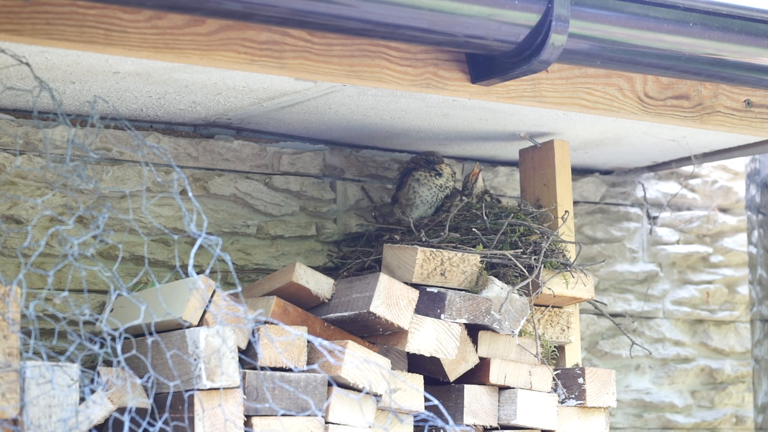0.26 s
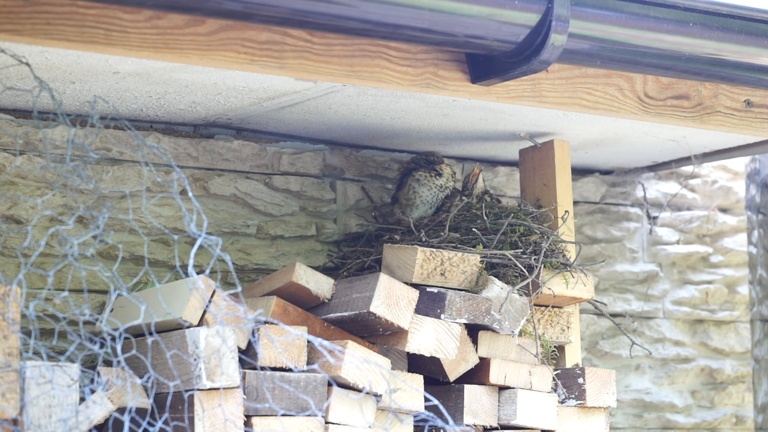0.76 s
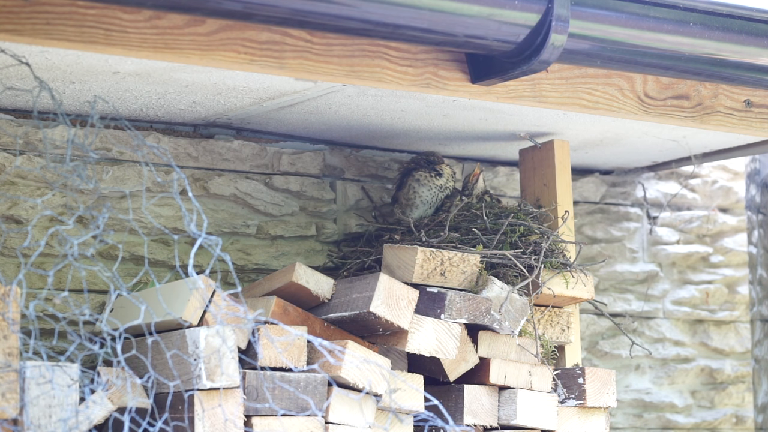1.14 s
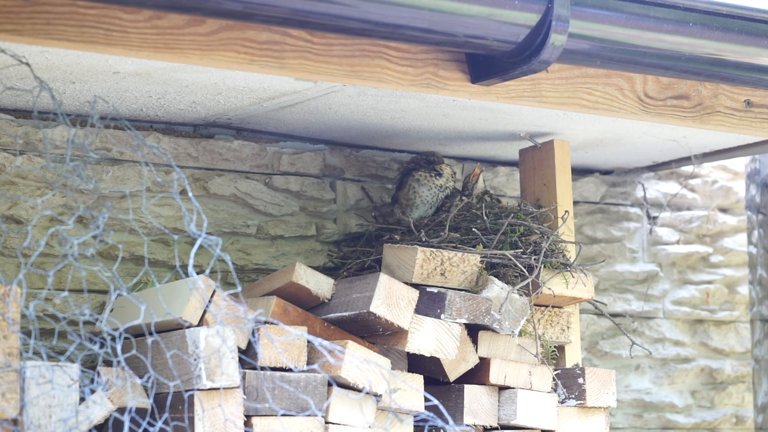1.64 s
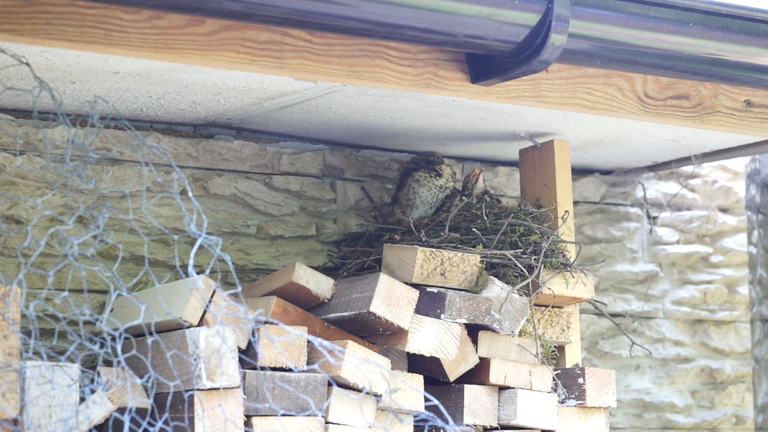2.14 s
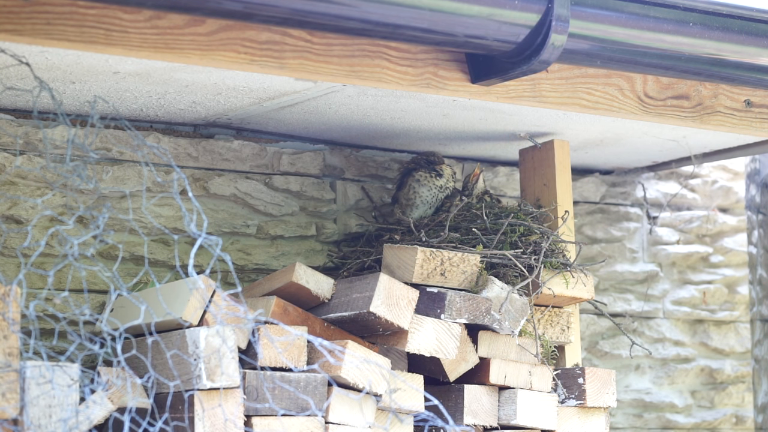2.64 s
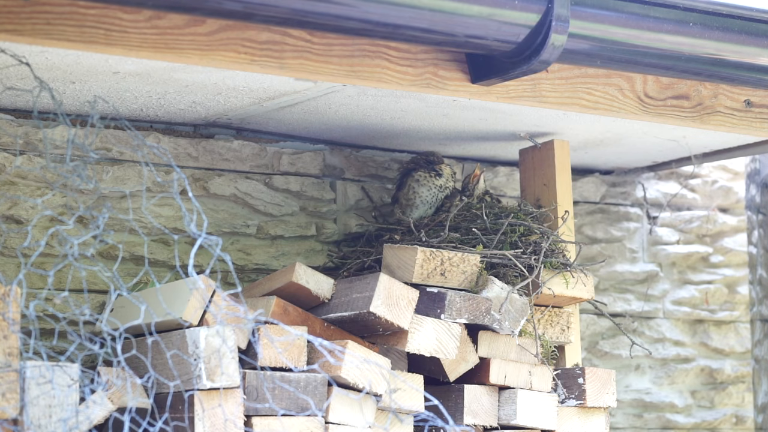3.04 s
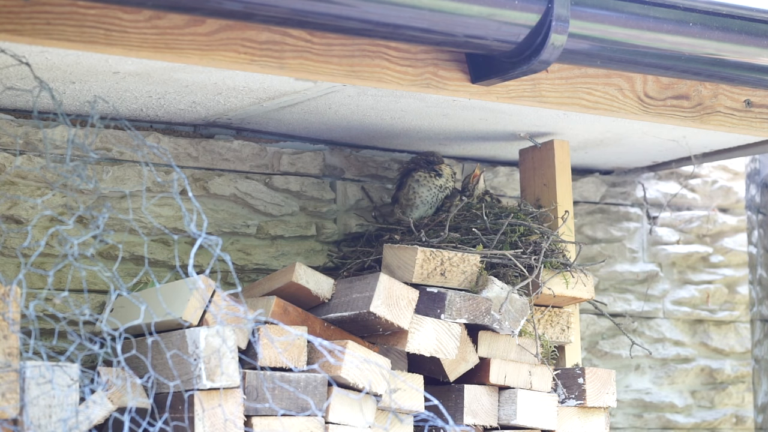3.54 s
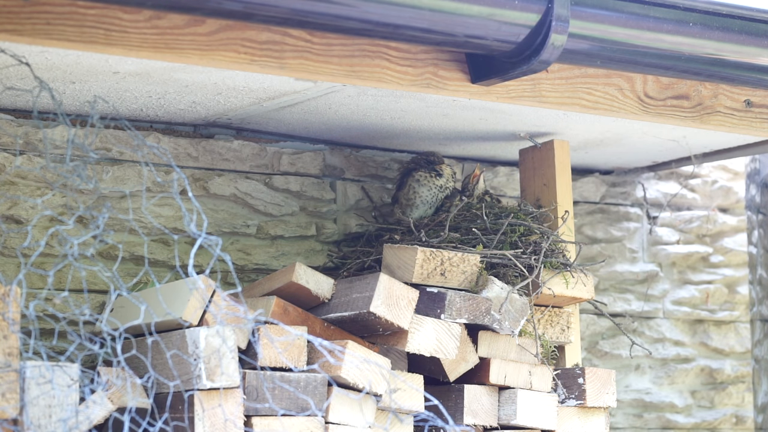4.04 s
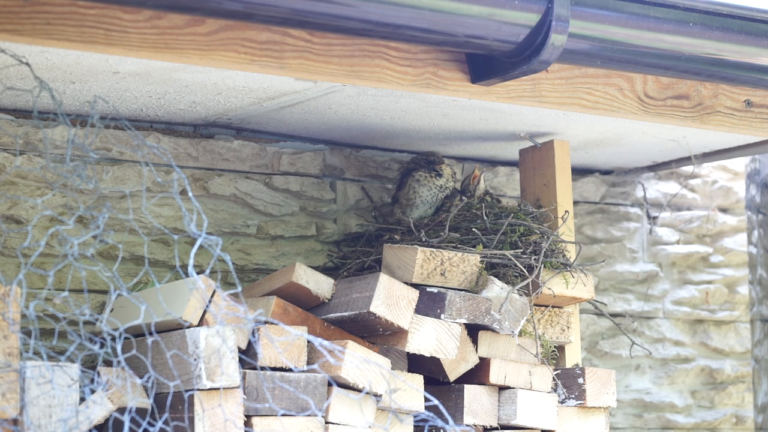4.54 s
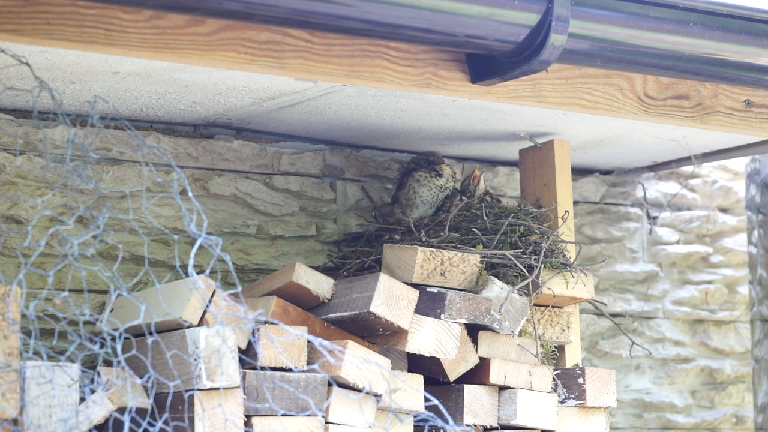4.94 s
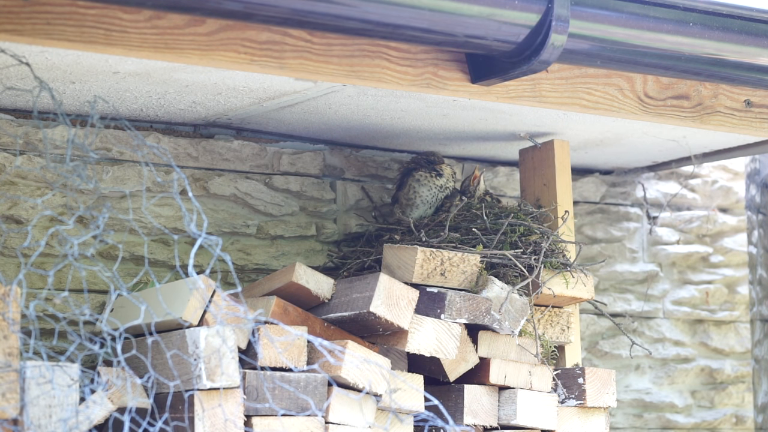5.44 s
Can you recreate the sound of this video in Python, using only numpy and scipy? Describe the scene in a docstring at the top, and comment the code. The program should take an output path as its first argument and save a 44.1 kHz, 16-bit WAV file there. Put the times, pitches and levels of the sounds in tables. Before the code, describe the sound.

Outdoors in a garden by a stone wall, distant birds chirp first, then a nearer thrush-like bird sings quick fluted slurs, plunging chirps and buzzy twitters for about three seconds. A smaller bird follows with a short trill and a higher, thinner one. Soft traffic rumble and hiss lie beneath, and the camera microphone picks up a faint lens-motor whine.

```python
"""Garden birdsong under the eaves

A thrush-like bird sings one phrase of fluted slurs and buzzy twitters, a smaller bird answers with
two thin trills and others call far off: near-pure tones on drawn pitch laws, echoed by wall and yard.
Distant traffic rumbles under steady hiss (coloured and resonant noise). A camera's lens motor whines
faintly, swelling at each refocus; its electronics whistle, and one tiny tick is heard."""
import sys
import numpy as np
from scipy import signal
from scipy.fft import rfft, irfft
from scipy.io import wavfile
from scipy.ndimage import map_coordinates

SR = 44100
rng = np.random.default_rng(int(sys.argv[2]) if len(sys.argv) > 2 else 0)


def dump_mix(stems):
    """Bounce the given channels to the path in sys.argv[1] as a 16-bit WAV at rate SR."""
    frames = np.atleast_2d(stems).T  # one column per channel
    limited = np.clip(frames, -1, 1)  # hard clip at full scale
    pcm = np.round(limited * 32767).astype(np.int16)
    wavfile.write(sys.argv[1], SR, pcm)


N = 250488
TIME = np.arange(N) / SR

# distant traffic level: time_s, level_db
TRAFFIC_LEVEL = [(0, -58.5), (.8, -57), (4.1, -56), (4.7, -57.5), (5.68, -67)]


def from_db(db):
    """Decibels to amplitude gain."""
    return 10 ** (np.asarray(db) / 20)


def rms_one(x):
    """Scale to unit power."""
    return x / np.sqrt(np.mean(x ** 2) + 1e-20)


def curve(rows, x):
    """Each column after the first, joined by straight lines over the first."""
    knots, *columns = np.transpose(rows)
    return [np.interp(x, knots, column) for column in columns]


def ease(share):
    """A smooth step from 0 to 1."""
    return np.sin(np.pi / 2 * np.clip(share, 0, 1)) ** 2


def bump(center_s, half_width_s, level_db):
    """A Gaussian rise and fall of strength."""
    return from_db(level_db) * np.exp(-((TIME - center_s) / half_width_s) ** 2 / 2)


def drift(knots_per_s):
    """Smooth random motion with a spread of about 1: a cubic spline through random knots."""
    knots = rng.standard_normal(8192)
    return map_coordinates(knots, [TIME * knots_per_s], order=3, mode="wrap")


def stereo_noise(spectrum):
    """Unit-power coloured noise: channels alike in the bass, slightly opposed higher up."""
    # left-right likeness: freq_hz, correlation
    likeness = [(50, 0.92), (125, 1), (300, 0.67), (600, -0.33), (1400, -0.21), (3000, -0.087),
                (13000, -0.22)]
    log_hz = np.log(np.fft.rfftfreq(N, 1 / SR) + 1)

    def over_log_hz(rows):
        hz, value = np.transpose(rows)
        return np.interp(log_hz, np.log(hz), value)

    gain = from_db(over_log_hz(spectrum))
    alike = np.clip(over_log_hz(likeness), -1, 1)
    mid, side = rfft(rng.standard_normal((2, N)))
    left_right = np.sqrt(1 + alike) * mid + np.sqrt(1 - alike) * side * [[1], [-1]]
    return rms_one(irfft(gain * left_right, N))


def resonance(hz, width_hz):
    """A narrow resonance driven by noise, run 1 s beforehand to settle."""
    sos = signal.butter(2, [hz - width_hz / 2, hz + width_hz / 2], "band", fs=SR, output="sos")
    return rms_one(signal.sosfilt(sos, rng.standard_normal(N + SR))[SR:])


def pan(side_db):
    """Left and right gains of constant power; positive is left."""
    return rms_one(from_db([[side_db / 2], [-side_db / 2]]))


def syrinx(hz, loudness, overtone_db=-36):
    """A nearly pure whistle with a trace of its octave."""
    phase = 2 * np.pi * np.cumsum(hz) / SR
    return np.sqrt(2) * loudness * (np.sin(phase) + from_db(overtone_db) * np.sin(2 * phase))


def whistle(t, length_s, hz):
    """Pitch stays level."""
    return np.full(len(t), hz)


def twitter(t, length_s, start_hz, held_hz, depth, flutter):
    """A slur shaken by the flutter of the membrane."""
    return slur(t, length_s, start_hz, held_hz) * (1 + depth * flutter[:len(t)])


def sweep(t, length_s, top_hz, bottom_hz):
    """Pitch plunges at an even number of octaves a second."""
    return top_hz * (bottom_hz / top_hz) ** (t / length_s)


def slur(t, length_s, start_hz, held_hz, settle_share=.28):
    """Pitch relaxes towards the held note; the time constant is a share of the length."""
    return held_hz + (start_hz - held_hz) * np.exp(-t / (settle_share * length_s))


def scoop(t, length_s, start_hz, low_hz, top_hz, sag_s, climb_s):
    """Pitch sags to its lowest, climbs to the top and stays there."""
    sag_hz = (low_hz - start_hz) * ease(t / sag_s)
    climb_hz = (top_hz - low_hz) * ease((t - sag_s) / climb_s)
    return start_hz + sag_hz + climb_hz


def arch(t, length_s, start_hz, top_hz, last_hz, lift_s=.055, droop_s=.062):
    """Pitch lifts to the top, holds and droops away."""
    lift_hz = (top_hz - start_hz) * ease(t / lift_s)
    droop_hz = (last_hz - top_hz) * ease(1 - (length_s - t) / droop_s)
    return start_hz + lift_hz + droop_hz


def notes(table, pitch_law, bird, unsteady, sides, fade_db, attack_s=0.0041, release_s=0.0027):
    """One bird's notes of one kind: each opens quickly, fades along its pitch law and stops."""
    out = np.zeros((2, N))
    for start_s, length_s, level_db, *pitches, who in table:
        if who != bird:
            continue
        on = (TIME >= start_s) & (TIME < start_s + length_s)
        t = TIME[on] - start_s
        hz = pitch_law(t, length_s, *pitches)
        gate = ease(np.minimum(t / attack_s, (length_s - t) / release_s))
        loudness = from_db(level_db - fade_db * (t / length_s - .5)) * gate
        side_db = curve(sides, np.median(hz))[0] if sides else 0
        out[:, on] += pan(side_db) * syrinx(hz * (1 + unsteady[on]), loudness)
    return out


def song(bird, waver, sides=None):
    """All untrilled notes of one bird: pitch wavers, and a fast, uneven flutter makes twitters buzz."""
    # In all six, level_db is that at mid-note, before the garden.
    # level whistles: start_s, length_s, level_db, pitch_hz, bird
    whistled_notes = [ (1.928, 0.11, -48, 2300, "singer"), (2.365, 0.096, -51, 4050, "singer"),
                      (5.645, .06, -52.5, 4370, "small"), (0, 0.047, -62, 3050, "far"),
                      (.05, 0.2, -67, 2465, "far"), (.31, .07, -65, 4780, "far"),
                      (.96, 0.089, -66, 2687, "far"), (4.08, 0.18, -58, 3546, "far"),
                      (4.71, 0.19, -56.5, 3555, "far"), (5.26, 0.11, -65, 2890, "far")]
    # buzzing slurs: start_s, length_s, level_db, start_hz, held_hz, buzz_depth (share of pitch), bird
    twitters = [ (.19, 0.058, -60, 3020, 3680, 0.037, "far"),
                (.555, 0.067, -55.5, 3200, 3620, 0.063, "far"), (.62, 0.067, -59, 4320, 4800, 0.069, "far"),
                (.755, 0.022, -46, 3460, 3170, 0.067, "singer"),
                (2.135, 0.073, -49.5, 3690, 3340, .09, "far"), (2.14, 0.046, -50, 2703, 2300, 0.1, "far"),
                (5.115, 0.099, -59, 3520, 3200, 0.036, "far"), (5.26, .14, -65.5, 3000, 2830, 0.059, "far"),
                (1.372, 0.028, -48.5, 6180, 6580, 0.01, "singer"),
                (1.505, 0.03, -56, 4400, 4200, 0.026, "singer"),
                (2.03, 0.027, -59, 5570, 5830, 0.023, "singer"),
                (2.66, 0.056, -50.5, 4950, 4770, 0.039, "singer"),
                (2.823, 0.045, -50.5, 5500, 5230, 0.073, "singer"),
                (2.97, 0.028, -54.5, 5130, 5020, 0.02, "singer"),
                (3.06, 0.05, -51, 5500, 6550, 0.017, "singer"),
                (3.09, 0.064, -47.5, 6340, 5780, 0.07, "singer"),
                (3.375, 0.036, -51, 4390, 4320, 0.084, "singer")]
    # steep plunges: start_s, length_s, level_db, top_hz, bottom_hz, bird
    sweeps = [ (1.155, 0.032, -39, 4200, 2950, "singer"), (1.875, 0.05, -41, 4450, 2390, "singer"),
              (2.722, 0.031, -40, 3950, 2760, "singer"), (3.645, 0.035, -59, 7300, 5800, "singer"),
              (4.584, 0.025, -56.5, 4750, 3300, "small"), (4.636, .027, -56, 4700, 3300, "small"),
              (.375, 0.025, -50.5, 4350, 3005, "far"), (.765, 0.031, -51, 3700, 1846, "far")]
    # slides onto a held pitch: start_s, length_s, level_db, start_hz, held_hz, bird
    slurs = [ (1.05, 0.027, -43.5, 3870, 4130, "singer"), (1.088, 0.05, -38, 3710, 2992, "singer"),
             (1.265, 0.055, -50, 2126, 2560, "singer"), (1.515, 0.049, -41.5, 3850, 2984, "singer"),
             (1.64, 0.115, -50, 2570, 2345, "singer"), (1.853, 0.028, -48.5, 4490, 4313, "singer"),
             (2.683, 0.051, -43.5, 3610, 4120, "singer"), (2.947, 0.042, -41.5, 2907, 2606, "singer"),
             (4.695, 0.085, -52.5, 5200, 4470, "small"), (.9, 0.075, -55, 3230, 3750, "far"),
             (4.28, 0.17, -56.5, 3315, 3107, "far")]
    # sag, climb and hold: start_s, length_s, level_db, start_hz, lowest_hz, top_hz, sag_s, climb_s, bird
    scoops = [ (2.234, 0.14, -40.5, 2830, 2650, 3112, 0.025, 0.065, "singer"),
              (2.553, 0.074, -42, 3760, 3237, 3445, 0.042, 0.027, "singer"),
              (2.845, 0.074, -37.5, 3090, 3077, 3272, 0.0177, 0.0423, "singer"),
              (3.18, 0.111, -40.5, 3900, 3680, 4032, .043, 0.0253, "singer"),
              (4.435, 0.09, -55, 6900, 6120, 7160, 0.019, 0.069, "small")]
    # lift, hold and droop: start_s, length_s, level_db, start_hz, top_hz, last_hz, bird
    arches = [(3.405, .138, -40, 2757, 2908, 2514, "singer"),
              (3.641, .11, -40.5, 3534, 3566, 3047, "singer")]
    unsteady = waver * drift(220)
    buzz_hz = 170.6 * (1 + 0.22 * drift(114.0))
    flutter = np.sin(2 * np.pi * np.cumsum(buzz_hz) / SR)

    def buzzing(*note):
        return twitter(*note, flutter)

    return (notes(whistled_notes, whistle, bird, unsteady, sides, fade_db=3.5)
            + notes(twitters, buzzing, bird, unsteady, sides, fade_db=7.0)
            + notes(sweeps, sweep, bird, unsteady, sides, fade_db=3.5)
            + notes(slurs, slur, bird, unsteady, sides, fade_db=3.0)
            + notes(scoops, scoop, bird, unsteady, sides, fade_db=2)
            + notes(arches, arch, bird, unsteady, sides, fade_db=1.5))


def garden(x, direct_db, walls_db, near_db, near_t60_s, far_db, far_t60_s, port_lag_s=0):
    """Direct sound, echoes off wall and eaves, yard scatter and a long tail from trees and houses."""
    # wall and eaves echoes: left_delay_s, right_delay_s, level_db (re walls_db)
    wall_echoes = [(.0031, .0036, -3.5), (0.0114, .0105, 0)]
    t = TIME[:int(1.6 * SR)]
    response = np.zeros((2, len(t)))
    for level_db, t60_s in ((near_db, near_t60_s), (far_db, far_t60_s)):
        decay = from_db(-60 * t / t60_s) * (1 - np.exp(-t / 0.014))
        scatter = rng.standard_normal(response.shape) * decay
        response += from_db(level_db) * rms_one(scatter) / np.sqrt(len(t))   # unit energy, then level
    # a bird to the left reaches the right port later
    response[[0, 1], [0, int(port_lag_s * SR)]] += from_db(direct_db)
    for left_s, right_s, level_db in wall_echoes:
        response[[0, 1], [int(left_s * SR), int(right_s * SR)]] += from_db(level_db + walls_db)
    return signal.fftconvolve(x, response, axes=1)[:, :N]


def far_birds():
    """Scattered distant calls: the direct sound is weak against the scatter."""
    return garden(song("far", waver=.009), direct_db=-9, walls_db=-12,
                  near_db=-3.5, near_t60_s=0.44, far_db=-4, far_t60_s=1.3)


def chorus():
    """Distant song blurred into coloured noise of wandering level."""
    # chorus level: time_s, level_db
    chorus_level = [(0, -62), (.5, -58), (.9, -55), (1.35, -55), (2.4, -73.5), (4.2, -64.5), (5.68, -68.5)]
    # chorus spectrum: freq_hz, gain_db
    chorus_colour = [(2000, -22.5), (2700, -6.5), (3400, 0), (4100, 0), (5100, -5), (5500, -10.5),
                     (8000, -38)]
    level_db = curve(chorus_level, TIME)[0] + 2.2 * drift(19)
    return from_db(level_db) * stereo_noise(chorus_colour)


def road():
    """Low coloured noise following the traffic level, with deep swells of rumble."""
    # rumble spectrum: freq_hz, gain_db
    traffic_colour = [(40, -12.5), (110, 2.5), (200, 3), (310, -6), (380, -9.5), (700, -30)]
    # deep swells: center_s, half_width_s, peak_db
    swells = [(2.96, 0.11, -48), (3.75, 0.167, -53.5), (4.051, 0.11, -45.5), (5.521, 0.2, -54)]
    # swell spectrum: freq_hz, gain_db
    swell_colour = [(70, -18), (115, -5), (150, 5), (220, -9.5), (330, -9.5), (500, -44)]
    rumble = from_db(curve(TRAFFIC_LEVEL, TIME)[0]) * stereo_noise(traffic_colour)
    return rumble + sum(bump(*swell) for swell in swells) * stereo_noise(swell_colour)


def drone():
    """Two low resonances an octave apart that rise and fade with the traffic."""
    traffic_db = curve(TRAFFIC_LEVEL, TIME)[0]
    low = from_db(-59) * resonance(hz=72, width_hz=11)
    octave = from_db(-64) * resonance(hz=144, width_hz=12)
    return (low + octave) * from_db(traffic_db - np.median(traffic_db))


def engine():
    """One far engine going by: a noisy resonance that swells and ebbs."""
    return bump(1.71, 1.0, -59.5) * resonance(hz=260.3, width_hz=84)


def hiss():
    """Steady air and microphone noise."""
    # hiss spectrum: freq_hz, gain_db
    air = [(20, -14), (45, -2), (100, -2.5), (250, -20), (500, -16), (1000, -19.5), (2000, -17.5),
           (5000, -27), (8500, -29), (11500, -28), (12900, -24), (13700, -29), (15700, -28.5)]
    return from_db(-55.5) * stereo_noise(air)


def lens_motor(move_s=0.056, idle_db=-62, pulsing_db=3.0):
    """The servo jitters in its resonance all the time; each short move adds whine, tones and rasp."""
    # lens moves: center_s, level_db
    refocus = [(.79, -58.5), (1.17, -56), (1.64, -54), (2.15, -58), (2.61, -55.5), (3.2, -56.5),
               (3.572, -57.5), (4.52, -59), (4.981, -54), (5.591, -58)]
    # tones of a move: freq_hz, level_db (re the move)
    lens_tones = [(10234, -24), (10917, -20)]
    moving = sum(bump(center_s, move_s, level_db) for center_s, level_db in refocus)
    strength = np.hypot(from_db(idle_db), moving) * from_db(pulsing_db * drift(34))
    whine = strength * resonance(hz=1455, width_hz=79.4)
    tones = moving * sum(syrinx(np.full(N, hz), from_db(level_db)) for hz, level_db in lens_tones)
    rasp_colour = [(700, -16.5), (1600, 6.5), (2200, -5.5), (11000, -16), (14000, -15)]   # freq_hz, gain_db
    rasp = moving * from_db(-1.0) * stereo_noise(rasp_colour)
    return pan(-4.5) * (whine + tones + rasp)


def electronics():
    """Steady, faint, pure whistling from the camera's electronics."""
    # whistles: freq_hz, level_db
    whistles = [(9700, -81.5)]
    tones = sum(np.sqrt(2) * from_db(level_db) * np.sin(2 * np.pi * hz * TIME) for hz, level_db in whistles)
    return pan(-4.5) * tones


def singer():
    """The thrush-like bird: the eaves hide it, so much of its song arrives as echo."""
    # the wall colours each port differently: freq_hz, left_minus_right_db
    singer_side = [(2300, -0.5), (3050, -3), (3500, 0), (4000, -2), (4700, 1.5)]
    phrase = song("singer", waver=0.0055, sides=singer_side)
    return garden(phrase, direct_db=-5, walls_db=-8, near_db=-2.0, near_t60_s=0.6,
                  far_db=-7.5, far_t60_s=1.64, port_lag_s=.00008)


def tick():
    """One tiny, bright tick close to the microphone: a brief bump of treble noise."""
    colour = [(5000, -22), (9000, 4), (15000, -5)]   # freq_hz, gain_db
    return bump(2.9335, 0.00083, -53) * stereo_noise(colour)


def trill(gesture, start_s, period_s, count, first_hz, settled_hz, settle_syllables,
          loudest_syllable, peak_db, ebb_db, waver=0.0062):
    """One gesture repeated evenly: pitch sinks and settles, level ebbs either side of the loudest."""
    out = np.zeros(N)
    unsteady = 1 + waver * drift(150)
    for k in range(count):
        syllable_s = start_s + k * period_s
        hz = settled_hz + (first_hz - settled_hz) * np.exp(-k / settle_syllables)
        level_db = peak_db - ebb_db * abs(k - loudest_syllable)
        on = (TIME >= syllable_s) & (TIME < syllable_s + gesture[-1][0])
        ratio, loudness = curve(gesture, TIME[on] - syllable_s)
        out[on] += syrinx(hz * ratio * unsteady[on], from_db(level_db) * loudness)
    return out


def small_bird():
    """Thin notes and two trills, a lower and a higher, with a long tail."""
    # trill settings: start_s, period_s, count, first_hz, settled_hz, settle_syllables,
    # loudest_syllable (from 0), peak_db, ebb_db (per syllable)
    rising_trill = dict(start_s=3.77, period_s=.135, count=4, first_hz=4740, settled_hz=4600, settle_syllables=1.3, loudest_syllable=2.2, peak_db=-50.5, ebb_db=.6)
    high_trill = dict(start_s=4.816, period_s=.168, count=5, first_hz=8100, settled_hz=7420, settle_syllables=.95, loudest_syllable=3, peak_db=-52, ebb_db=2.2)
    # syllable gestures: time_s, pitch_ratio, loudness (0-1)
    rising_gesture = [(0, .99, 0), (.01, 1, .7), (.032, 1.025, 1), (.046, 1.075, .9), (.054, 1.085, 0),
                      (.06, .97, 0), (.07, .9, .35), (.088, .82, 0)]
    high_gesture = [(0, .99, 0), (.01, 1, .8), (.06, 1, 1), (.078, .985, .8), (.092, .955, .55),
                    (.103, .92, 0), (.152, .65, 0), (.162, .72, .3), (.174, .86, .25), (.18, .92, 0)]
    trills = trill(rising_gesture, **rising_trill) + trill(high_gesture, **high_trill)
    thin = song("small", waver=0.0027) + trills
    return pan(0.51) * garden(thin, direct_db=-2.5, walls_db=-10, near_db=-6.5, near_t60_s=.5,
                              far_db=-2, far_t60_s=1.8)


def scene():
    """Birds, surroundings and the camera's own noise."""
    birds = far_birds() + chorus() + singer() + small_bird()
    background = road() + drone() + engine() + hiss()
    return birds + background + lens_motor() + electronics() + tick()


def record(dry):
    """A steep elliptic low-pass cuts the top."""
    cutoff_hz = 15750
    return signal.sosfilt(signal.ellip(12, .1, 80, cutoff_hz, fs=SR, output="sos"), dry)


dry = scene()
out = record(dry)
dump_mix(out)
```